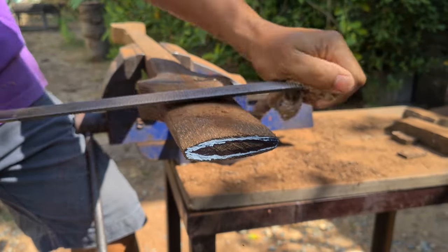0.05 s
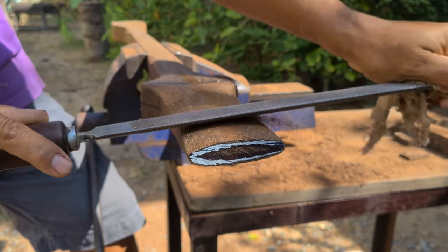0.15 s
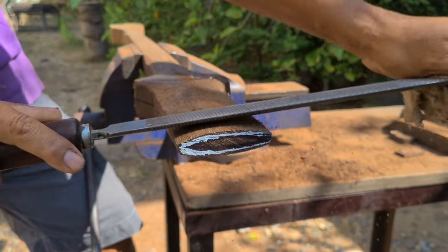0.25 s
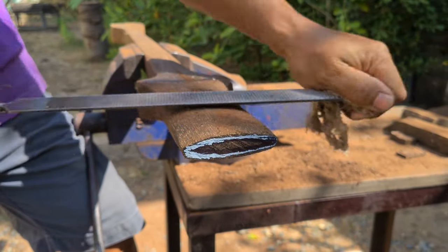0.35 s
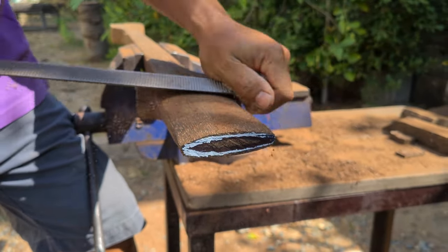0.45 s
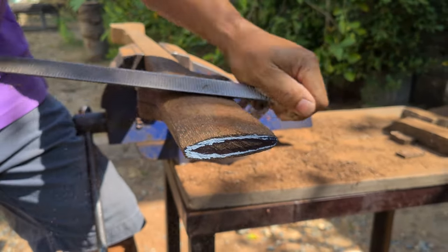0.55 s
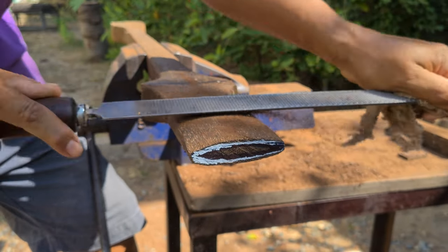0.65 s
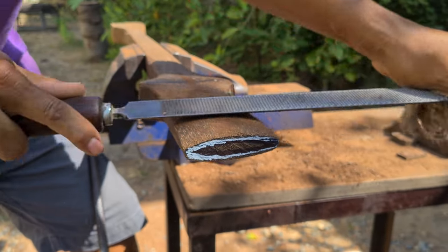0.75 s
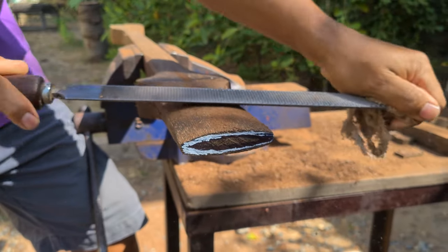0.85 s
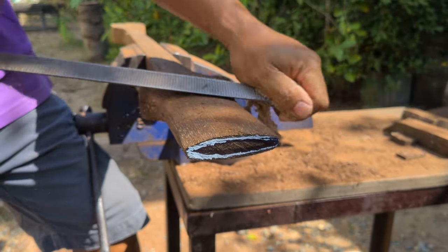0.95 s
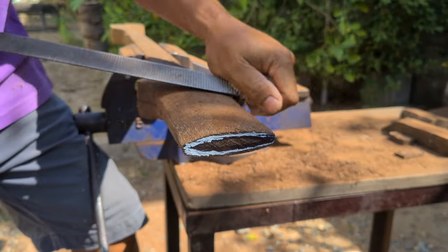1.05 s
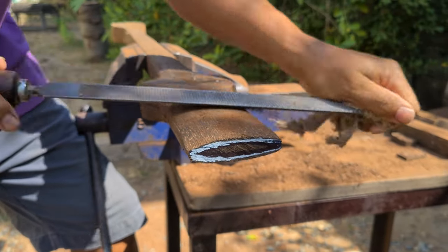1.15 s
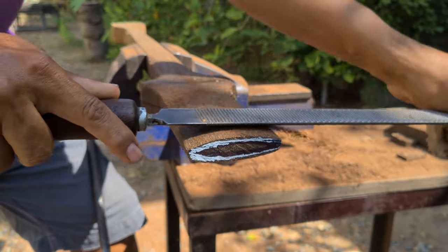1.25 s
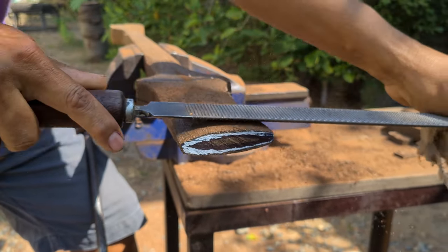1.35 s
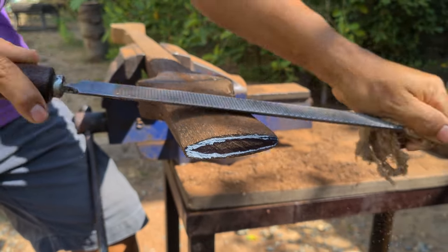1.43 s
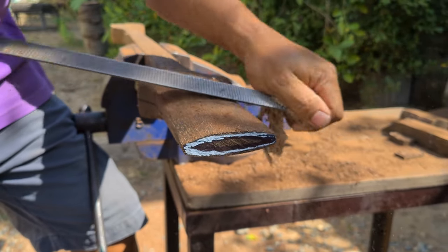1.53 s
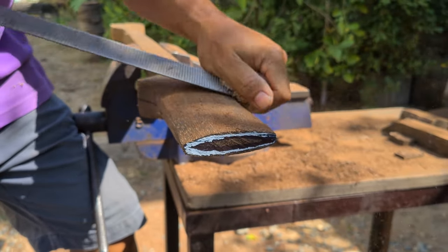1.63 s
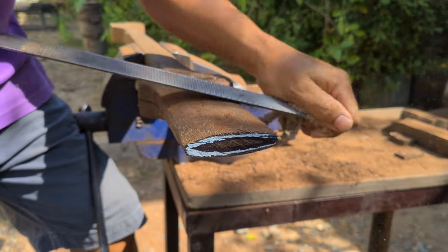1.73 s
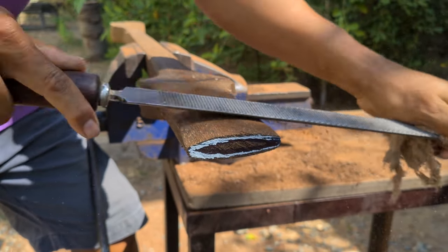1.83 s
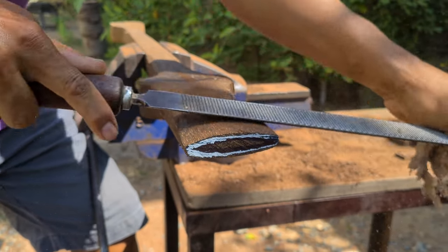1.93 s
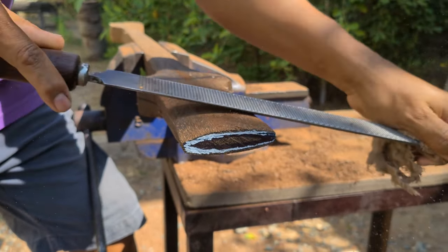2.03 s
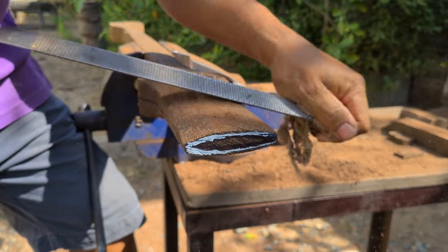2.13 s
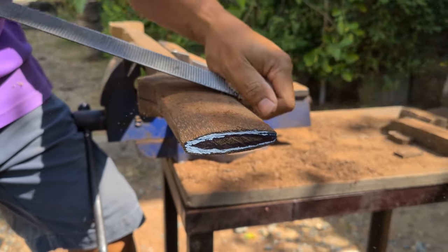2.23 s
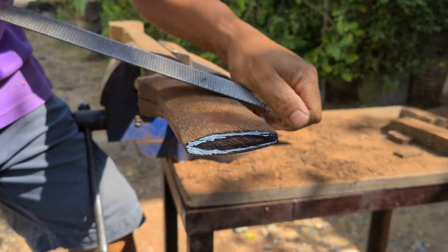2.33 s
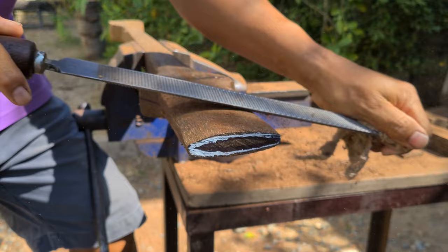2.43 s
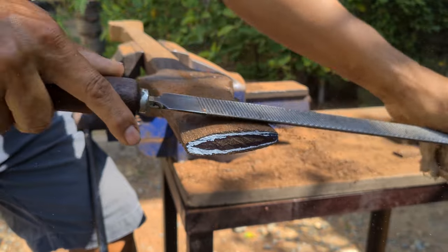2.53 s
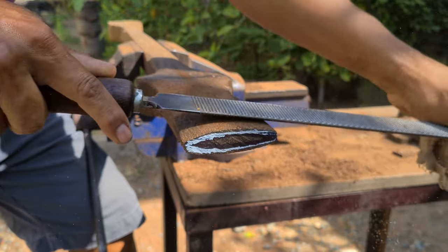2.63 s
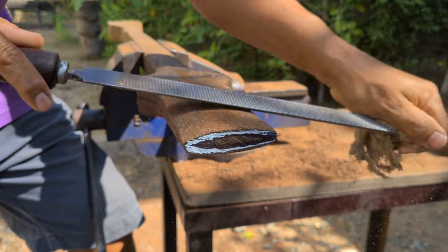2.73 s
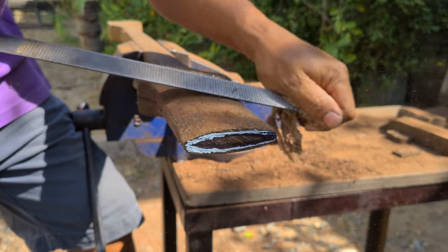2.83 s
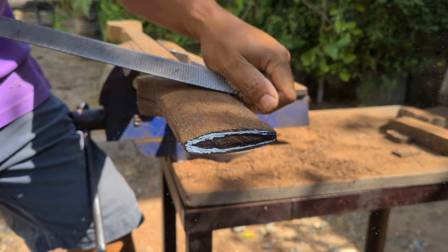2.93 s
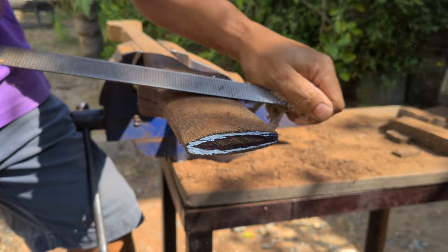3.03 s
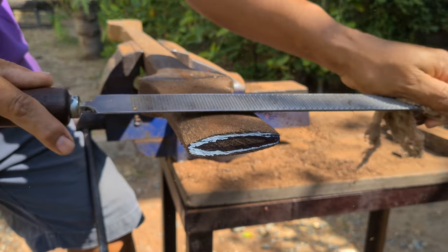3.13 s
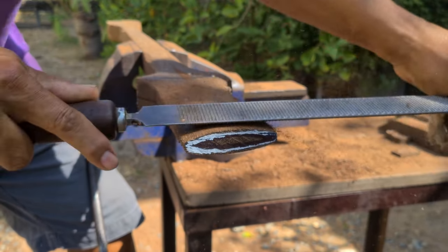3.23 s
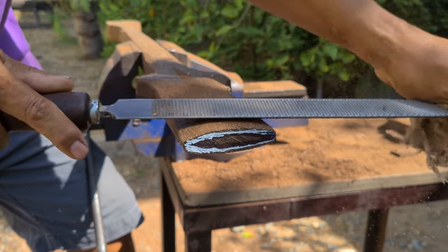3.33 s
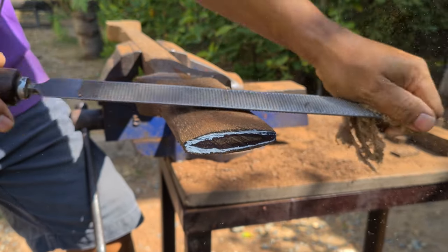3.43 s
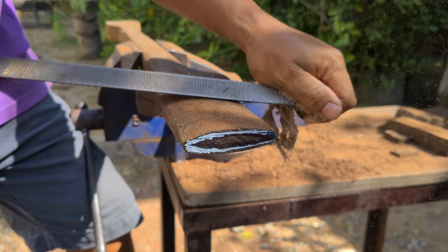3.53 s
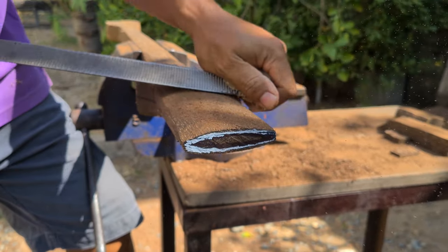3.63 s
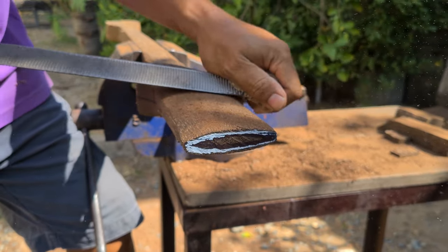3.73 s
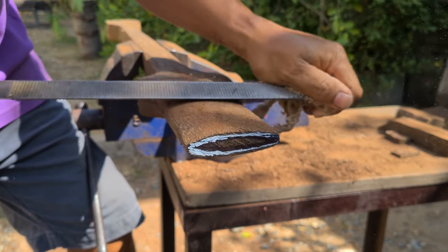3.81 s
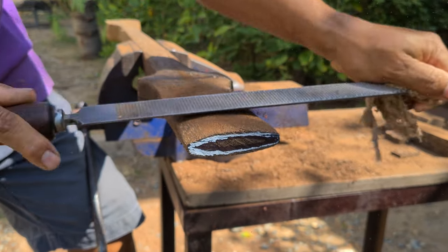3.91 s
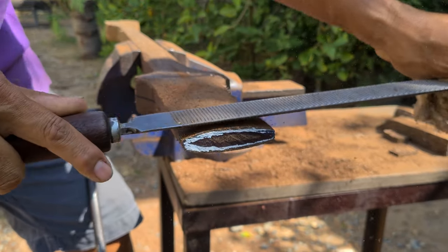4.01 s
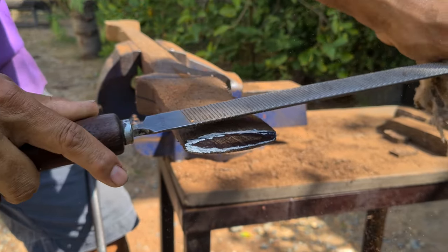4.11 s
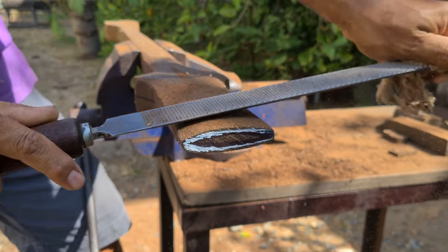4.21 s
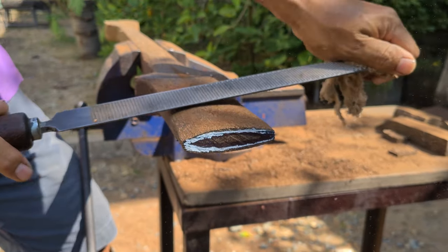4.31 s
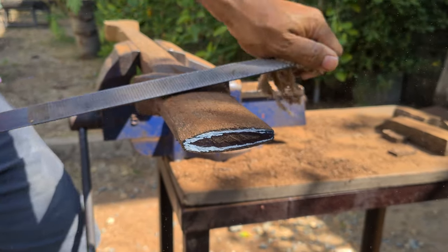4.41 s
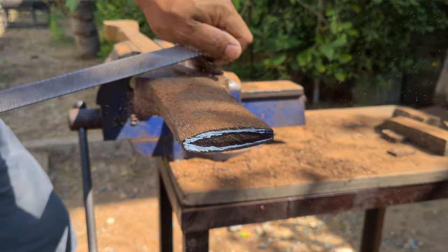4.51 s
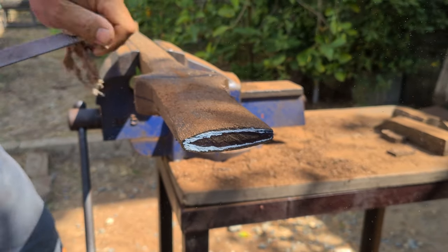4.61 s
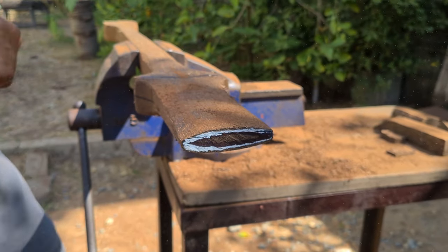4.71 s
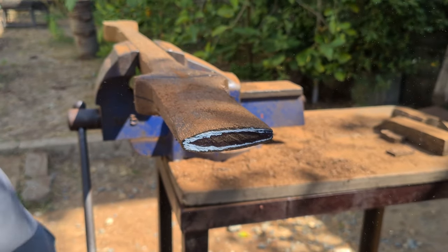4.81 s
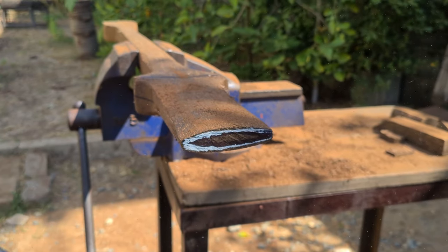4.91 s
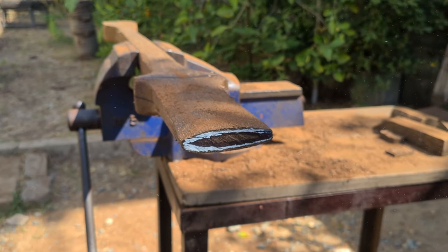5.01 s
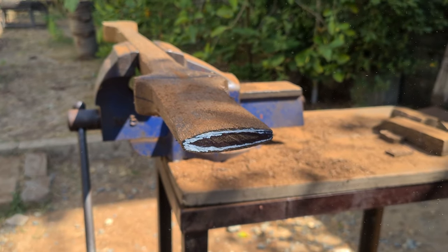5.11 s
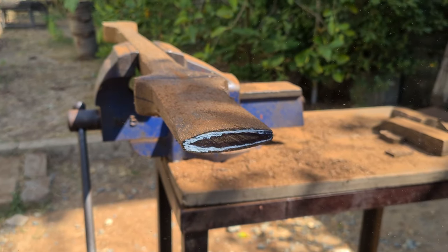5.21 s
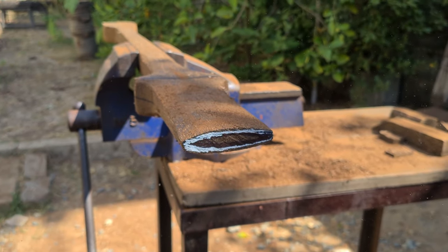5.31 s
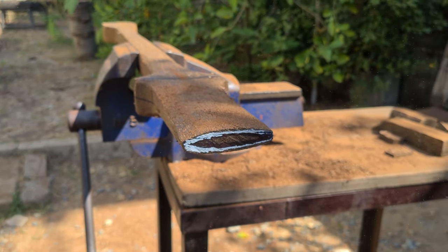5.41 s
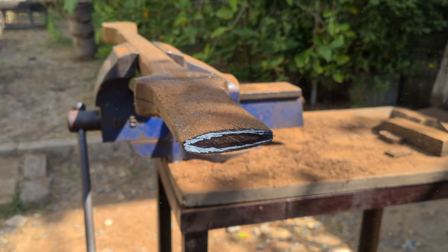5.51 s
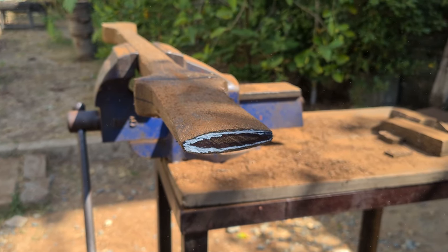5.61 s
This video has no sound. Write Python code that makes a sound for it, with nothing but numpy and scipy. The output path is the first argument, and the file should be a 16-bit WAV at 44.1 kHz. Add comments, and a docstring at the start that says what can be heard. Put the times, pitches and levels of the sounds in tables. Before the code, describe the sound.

Close, dry, stereo filing outdoors. The end of a faint pull is heard at 0 seconds, then a coarse file bites a wooden blank in a vice. Seven loud pushes begin near 0.07, 0.6, 1.15, 1.75, 2.4, 3.05 and 3.8 seconds, each lasting about 0.3 seconds: a fast gritty rasp with woody and metallic ringing, bright at first, sinking into a rough growl as the file slows. Lighter, thinner, scratchy pulls fill the gaps, lengthening later. A dull knock falls at 0.4 and a weaker, brighter one at 2.4. The last push is softer; small knocks and a dry tick around 4.3 lead into a weak final pull ending near 4.6. A short gritty shoe scuff follows at 4.75, then tiny ticks near 5.0 and 5.55. Behind lie quiet open air, low rumble that swells mid-way and fades, and a distant engine hum easing after about 1.2 seconds.

```python
"""First heard is the tail of a light pull; then a coarse steel file bites into a wooden handle blank in a vice.
Outdoors and close by: seven rasping pushes, each followed by a lighter pull, then ticks and the scuff of a shoe.
Tooth kicks and snapping fibres, as pulses and impulses, ring the modes of blank, vice and file.
Coloured noise adds knocks, ticks, scuff, open air and rumble; two wavering sines make a far engine's hum."""
import sys
import numpy as np
from scipy import signal
from scipy.fft import rfft, irfft, next_fast_len
from scipy.io import wavfile

SR = 44100
rng = np.random.default_rng(int(sys.argv[2]) if len(sys.argv) > 2 else 0)


def put_to_file(sound):
    """Save the sound as 16-bit audio at rate SR, in the file named by the first command-line argument."""
    columns = np.atleast_2d(sound).T  # one column per channel
    safe = np.clip(columns, -1, 1)
    whole_steps = np.round(safe * 32767)
    wavfile.write(sys.argv[1], SR, whole_steps.astype(np.int16))


N = 249606
TIME = np.arange(N) / SR   # t/s
SIZE = next_fast_len(N + SR // 2)   # transform length, with room for half a second of tail
HZ = np.maximum(np.arange(SIZE // 2 + 1) * SR / SIZE, 1)   # f/Hz

# Open air and low rumble, colour: [f/Hz, relative level/dB]
AIR_SPECTRUM = [(100, -7), (220, -13.5), (380, -11.5), (620, -19), (1400, -21.5), (2300, -17.5),
                (3200, -27.5), (4800, -27.5), (5400, -36), (7500, -41), (9000, -47.5), (15000, -55.5)]
RUMBLE_SPECTRUM = [(20, -27.5), (48, -10), (95, -12.5), (130, -19.5), (190, -29), (400, -67)]
# Open air over time: [t/s, level/dB]
AIR_LEVEL = [(0, -46), (3.3, -48.5), (4.2, -55), (5.2, -55.5), (5.65, -51.5)]
# Rumble swells, then settles: [t/s, level re RUMBLE_DB/dB]
RUMBLE_SWELL = [(.8, -7.5), (1.8, 3.5), (3.9, 2.5), (4.4, -6)]
RUMBLE_DB = -49
# Two tones of the far engine, about which pitch and level waver: [f/Hz, level at first/dB, level once eased off/dB]
HUM_TONES = [(75.7, -42.5, -59), (99, -52, -51.5)]
EASES_S, EASING_S = 1.14, 0.44   # when the engine starts to ease off, and for how long
# Shoe on the ground, colour: [f/Hz, relative level/dB]
SCUFF_SPECTRUM = [(500, -10.5), (1300, -11.5), (1900, -2), (2600, -8.5), (3600, -2.5), (5000, -16.5),
                  (8000, -30), (15000, -37)]
SCUFF_S, SCUFF_DB, SCUFF_RISE_DB_PER_S, SCUFF_FALL_DB_PER_S = 4.748, -42, 283, 170

# Small dry ticks: [t/s, peak level/dB, centre f/Hz]
TICKS = [(4.345, -20, 1300), (4.663, -43, 1880), (4.986, -39.5, 1440), (5.544, -49, 2000)]
# File knocking on the blank: [t/s, peak level/dB, contact brightness f/Hz]
KNOCKS = [(.410, -11, 680), (2.425, -19, 6000), (4.289, -21, 1400), (4.346, -22, 1800), (4.478, -20, 900)]

# Modes of blank, vice and file:
# [f/Hz, width before damping/Hz, relative level pushing/dB, relative level pulling/dB]
WORK_MODES = [(238, 30, -11, -3), (399, 20, -5, -19), (455, 50, -18, -19), (625, 40, -18, -11),
              (696, 30, -1.5, -1), (870, 70, -12, -19), (1045, 60, -13, -19), (1135, 60, -12, -22),
              (1435, 70, -14, -18), (1685, 55, -2, -8), (1805, 65, -3, -11), (1995, 60, -12, -22),
              (2175, 80, -15, -18), (2478, 55, -6.5, -17), (2615, 60, -11, -25), (2880, 65, -1, -10),
              (3060, 120, -11, -16), (4020, 170, -9, -17), (4900, 250, -16, -26), (5970, 200, -16, -29),
              (7230, 250, -21, -26), (8890, 100, -20, -23), (10810, 100, -20, -24), (12660, 110, -19, -23),
              (14500, 200, -30, -43)]
# Each of those modes at the ears: [left over right/dB, phase by which left leads/rad]
MODES_AT_EARS = [(-1, -0.1), (0, -0.9), (-1, 0.2), (-5, 0.1), (-10, 0.4), (-1, 3.0), (6, 1.4), (3, 1.1),
                 (0, -0.4), (-2, 1.8), (-2, -2.7), (-4, -1.5), (-3, 1.2), (-3, -0.4), (1, 0.3), (3, 0.4),
                 (4, -2.7), (2, 0.3), (-1, 0.5), (6, -2.6), (-1, 0.1), (-9, -2.7), (-6, -2.7), (2, -2.1),
                 (3, -0.5)]
EAR_LAG_S = 0.000466   # the left ear is nearer
# Where the file bears decides how well it feeds the rocking, bending and vice modes:
# [t/s, rocking feed/dB, bending feed/dB, vice feed/dB]
SEAT = [(0.198, -5, -1.5, 2), (.8, 1.5, -2, -2.5), (1.3, -12, -19.5, -9.5), (2.2, 5, -19, 0.5),
        (3.2, -4, -34.5, -4.5), (3.98, 10.5, -14, 4.5), (4.35, -3.5, 2, 3)]
# Rows of WORK_MODES fed by the seat: [index, one per feed column]
SEAT_MODES = (0, 1, 4)

# Pulls: [start t/s, end t/s, relative bite level/dB, attack t/s, release t/s,
#   judder offset/dB, vice ring offset/dB, hiss offset/dB, first touch below the bite/dB]
PULLS = [(-0.22, 0.056, -23, 0.068, 0.061, -2.5, -5.5, -6, 25),
         (0.355, 0.595, -21.5, 0.11, 0.12, -5, -5, 1, 11),
         (0.896, 1.12, -24.5, 0.084, 0.051, -4.5, -4.5, 5.5, 6.5),
         (1.421, 1.74, -23.5, 0.19, 0.068, -2, 0.5, 5, 17.5),
         (2.035, 2.37, -24, 0.19, 0.085, -4.5, -3.5, 5, 32.5),
         (2.70, 3.051, -25, 0.15, 0.072, -1.5, -1, 7.5, 26.5),
         (3.357, 3.795, -26.5, .18, 0.11, -4, -3, 6.5, 22.5),
         (4.288, 4.594, -30, 0.24, 0.067, 0, 0.5, 1, 10.5)]
# A pull thins and brightens towards the file's tip, then judders at the very end:
# [share of stroke, judder re rasp/dB, ring re rasp/dB, hiss re rasp/dB], each before the stroke's offset
PULL_COURSE = [(0, 3.5, 10, -26.5), (.25, 7, 10.5, -28.5), (.5, 0, 5.5, -24), (.8, -4.5, -2.5, -18),
               (1, 11, -1.5, -28.5)]
# Sound straight from the cut on a pull: [f/Hz, relative level/dB]
PULL_SPECTRUM = [(150, -55), (300, -14), (500, -18), (900, -22), (1300, -18.5), (1700, -12.5),
                 (2400, -17.5), (3300, -17.5), (4500, -23.5), (6300, -48), (8500, -29.5), (11500, -47),
                 (15800, -48)]
# Pushes: [start t/s, end t/s, relative bite level/dB, attack t/s, release t/s,
#   judder offset/dB, vice ring offset/dB, hiss offset/dB, top speed/(tooth rows per s)]
PUSHES = [(0.074, 0.335, -17, 0.077, 0.091, 7, 3, -4, 410),
          (0.605, 0.85, -14, .065, 0.11, 3, 2.5, -2.5, 550),
          (1.136, 1.412, -14.5, 0.082, 0.089, -1, 1.5, -2.5, 501),
          (1.757, 2.024, -14.5, 0.081, 0.11, -0.5, 3, -1, 637),
          (2.385, 2.684, -14, 0.087, 0.062, 1, 1.5, -1.5, 550),
          (3.065, 3.338, -15.5, 0.084, 0.067, -.5, 2, -1.5, 500),
          (3.804, 4.135, -20, 0.13, 0.11, 4.5, 3.5, -2.5, 420)]
# As a push slows, hiss gives way to ring and judder: columns as in PULL_COURSE
PUSH_COURSE = [(0, -27, -10, -12), (.16, -21, -16, -9), (0.421, -16, -5.5, -10), (.68, -10.5, -2.5, -12.5),
               (.84, -6, 0.5, -20.5), (1, 3.5, 5, -27.5)]
# A push soon reaches top speed, then slows: [share of stroke, share of top speed]
PUSH_PACE = [(0, .65), (.18, 1), (.42, .91), (.53, .8), (.68, .52), (.84, .39), (1, .33)]
# Sound straight from the cut on a push: [f/Hz, relative level/dB]
PUSH_SPECTRUM = [(150, -21), (300, -13), (500, -20.5), (900, -8.5), (1300, -18.5), (1700, -4), (2150, -10),
                 (3200, -11.5), (4600, -18), (6300, -23.5), (8000, -28), (11500, -27), (13300, -25.5),
                 (15800, -52)]
# A stroke digs in, eases off steadily as the arms travel, and dies away as the file stops
PUSH_TOUCH_DB, STOP_DB = 21, 32.5
PUSH_SAG_DB_PER_S, PULL_SAG_DB_PER_S = 34, 18.5

CUTOFF_HZ = 15850
EARS = np.array([[1], [-1]])   # left, right


def from_db(db):
    """Amplitude factor from level/dB."""
    return np.exp(np.asarray(db) * (np.log(10) / 20))


def rms(x):
    """Root mean square, kept above zero."""
    return np.sqrt(np.mean(x ** 2) + 1e-24)


def in_time(rows):
    """Each column of a table, joined by straight lines in time."""
    s, *columns = np.transpose(rows)
    return [np.interp(TIME, s, c) for c in columns]


def colour(points):
    """Gain at every frequency, by straight lines in dB over log frequency."""
    hz, db = np.transpose(points)
    return from_db(np.interp(np.log(HZ), np.log(hz), db))


def through(x, response):
    """A signal passed through a frequency response."""
    return irfft(rfft(x, SIZE) * response, SIZE)[..., :N]


def band(x, low_hz, high_hz, order=3):
    """Butterworth band-pass."""
    sos = signal.butter(order, [low_hz, high_hz], "band", fs=SR, output="sos")
    return signal.sosfilt(sos, x)


def resonance(hz, width):
    """Response of one damped mode, 1 on top; a wider mode dies away sooner."""
    return 1 / (1 + 1j * (HZ ** 2 - hz ** 2) / (HZ * width))


def drift(rate):
    """Slow chance with a spread of about 1, from random points 2 * rate times a second."""
    steps = rng.standard_normal(N // 50)
    return 1.2 * np.interp(TIME * 2 * rate, np.arange(len(steps)), steps)


def noise(response, side):
    """Coloured stereo noise, rms 1; side sets how unlike the ears are."""
    mid, apart = rng.standard_normal((2, SIZE))
    x = through(mid + side * apart * EARS, response)
    return x / rms(x)


def engine_hum():
    """A far engine: two sines waver in level and phase, and ease to new levels."""
    eased = np.clip((TIME - EASES_S) / EASING_S, 0, 1)
    hum = 0
    for hz, first_db, later_db in HUM_TONES:
        level_db = first_db + (later_db - first_db) * eased + 1.2 * drift(8.9)
        phase = 2 * np.pi * hz * TIME + 0.67 * drift(5)
        hum = hum + from_db(level_db) * np.sqrt(2) * np.sin(phase)
    return hum


def open_air():
    """Wide coloured noise of the open air over a low, wavering rumble."""
    air = from_db(in_time(AIR_LEVEL)[0]) * noise(colour(AIR_SPECTRUM), side=0.77)
    rumble_db = RUMBLE_DB + in_time(RUMBLE_SWELL)[0] + 3.2 * drift(3.7)
    return air + from_db(rumble_db) * noise(colour(RUMBLE_SPECTRUM), side=0.661)


def shoe_scuff():
    """A shoe scuffs the ground: gritty noise in one swell and fade."""
    rise = SCUFF_RISE_DB_PER_S * (SCUFF_S - TIME)
    fall = SCUFF_FALL_DB_PER_S * (TIME - SCUFF_S)
    level_db = SCUFF_DB - np.maximum(rise, fall) + 2.7 * drift(70)
    return from_db(level_db) * noise(colour(SCUFF_SPECTRUM), side=0.73)


def surroundings(x, wet_db, t60, dull_hz):
    """A faint dull tail from hedge and walls: decaying noise echoes, treble lost above dull_hz."""
    t = TIME[:SR // 2]
    tail = rng.standard_normal((2, len(t))) * from_db(-60 * t / t60) * (t > .012)
    tail = tail / np.sqrt(np.sum(tail ** 2) / 2)
    return from_db(wet_db) * through(x, rfft(tail, SIZE) / (1 + 1j * HZ / dull_hz))


def modes(pushing, ring_db=2.0, damping=0.43):
    """Stereo response of each mode; damping scales its width, and the ears differ in level and phase."""
    half = EARS / 2
    responses = []
    for (hz, width, push_db, pull_db), (pan, lead) in zip(WORK_MODES, MODES_AT_EARS):
        mode_db = push_db if pushing else pull_db
        at_ears = from_db(mode_db + ring_db + pan * half) * np.exp(1j * lead * half)
        responses.append(at_ears * resonance(hz, width * damping))
    return responses


def blow(s, db, response, t60):
    """A brief crunching contact: a decaying noise burst into a response, at a given peak level."""
    age = np.maximum(TIME - s, 0)
    decay = from_db(-np.minimum(60 * age / t60, 200))
    x = through((age > 0) * rng.standard_normal(N) * decay, response)
    return from_db(db) * x / np.abs(x).max()


def ticks():
    """Short dry contacts, each a noise burst through one broad resonance."""
    return sum(blow(s, db, resonance(hz, 1400) ** 3, t60=0.061) for s, db, hz in TICKS)


def knocks():
    """The file knocks on the blank and rings the modes of the work."""
    body = sum(modes(pushing=False))
    return sum(blow(s, db, body * resonance(hz, hz) ** 2, t60=0.014) for s, db, hz in KNOCKS)


def row_count(speed, jitter):
    """Tooth rows passed so far, at an unsteady speed."""
    return np.cumsum(speed * (1 + jitter * drift(90))) / SR


def teeth(speed, jitter, uneven_db, tearing, snaps_per_s, snap_db, chatter_db):
    """Forces at three spots of the cut: a kick shared from each tooth row, and each spot's own snapping fibres."""
    rows = row_count(speed, jitter)
    kicks = np.diff(np.floor(rows), prepend=0) * from_db(uneven_db * rng.standard_normal(N))
    kicks = band(kicks, 80, 1160, order=1)   # wood yields, so a kick is soft
    sizes = from_db(snap_db * np.minimum(rng.exponential(1, (3, N)), 4)) * rng.standard_normal((3, N))
    struck = rng.random((3, N)) < snaps_per_s / SR
    snaps = sizes * struck * np.exp(-.8 * (rows % 1))   # strongest just after a row has passed
    return (kicks / rms(kicks) + tearing * snaps / rms(snaps)) * from_db(chatter_db * drift(45))


def bite(age, left, attack_s, release_s, touch_db, sag_db_per_s):
    """Level of a stroke/dB from time since start and time left: attack, sagging hold, release."""
    digging = np.clip(1 - age / attack_s, 0, 1) ** 2
    stopping = np.clip(1 - left / release_s, 0, 1) ** 2
    sag = sag_db_per_s * np.maximum(age - attack_s, 0)
    return -touch_db * digging - sag - STOP_DB * stopping


def strokes(table, course, touches_db, sag_db_per_s, fade_s=.012):
    """Progress through each stroke, and the gains of judder, ring, rasp and hiss as the contact travels."""
    share, *shapes = np.transpose(course)
    progress, gains = np.zeros(N), np.zeros((4, N))
    for (start, end, bite_db, attack_s, release_s, *own), touch_db in zip(table, touches_db):
        touching = np.clip(.5 + np.minimum(TIME - start, end - TIME) / fade_s, 0, 1)
        on = touching > 0
        age, left = TIME[on] - start, end - TIME[on]
        progress[on] = np.clip(age / (end - start), 0, 1)
        rasp_db = bite_db + bite(age, left, attack_s, release_s, touch_db, sag_db_per_s)
        # own also ends with a speed or a touch, which zip leaves out
        judder, ring, hiss = [np.interp(progress[on], share, shape) + db for shape, db in zip(shapes, own)]
        registers_db = rasp_db + np.array([judder, ring, 0 * ring, hiss])
        gains[:, on] += touching[on] * from_db(registers_db)
    return progress, gains


def drive(forces, body, gains):
    """Weights the forces so that judder, ring, rasp and hiss registers of the body each sound at their gain."""
    power, out = np.mean(np.abs(body) ** 2, axis=0), 0
    edges_hz = [140, 560, 1200, 6300, 17000]
    for low, high, gain in zip(edges_hz, edges_hz[1:], gains):
        part = band(forces, low, high)
        energy = 2 * np.sum(np.abs(rfft(part[0], SIZE)) ** 2 * power)
        out = out + gain * part / np.sqrt(energy / (SIZE * N))
    return out


def scatter(spectrum, t60, direct):
    """Sound from the cut arrives directly and scattered off bench and hands, differently at each ear."""
    t = TIME[:SR // 10]
    echoes = rng.standard_normal((2, len(t))) * from_db(-60 * t / t60)
    echoes = rfft(echoes, SIZE) / np.sqrt(np.sum(echoes ** 2) / 2)
    echoes = echoes * HZ / np.hypot(HZ, 900)   # long waves hardly scatter
    straight = direct * np.exp(-2j * np.pi * HZ * EAR_LAG_S * np.array([[0], [1]]))
    return colour(spectrum) * (straight + echoes) / np.hypot(direct, 1)


def radiate(forces, gains, ringing, spectrum, apart, shifting_db):
    """The modes ring, fed unevenly as the contact moves; the cut itself adds a broad rasp."""
    cut = scatter(spectrum, t60=0.028, direct=3.5)
    # each place along the file has dense resonances of its own, which take turns as the contact moves
    places = [scatter(spectrum, t60=0.11, direct=0.035) * HZ / np.hypot(HZ, 1500) for place in range(4)]
    turns = from_db([9 * drift(10) for place in places])
    turns = 0.47 * turns / np.linalg.norm(turns, axis=0)
    body = np.hypot(np.abs(sum(ringing)), np.abs(cut))
    main, near, far = drive(forces, body, gains)

    feeds = [from_db(shifting_db * drift(12) - 4.0) for mode in ringing]
    for k, db in zip(SEAT_MODES, in_time(SEAT)):
        feeds[k] = from_db(db + 2.0 * drift(12))
    rung = sum(mode * rfft(main * feed, SIZE) for mode, feed in zip(ringing, feeds))
    rung = irfft(rung, SIZE)[:, :N]

    patches = sum(through(far * turn, place) for turn, place in zip(turns, places))
    spread = (near + apart * far * EARS) / np.hypot(apart, 1)   # apart widens the rasp between the ears
    return rung + patches + 0.56 * through(spread, cut)


def growl(speed, jitter, uneven_db):
    """The blank shakes at the rate of the passing tooth rows, a rough tone that falls as the file slows."""
    rows = row_count(speed, jitter)
    return from_db(uneven_db * drift(40)) * np.sin(2 * np.pi * rows)


def pulls(speed=250.0):
    """The backs of the teeth skid irregularly over the wood; speed in tooth rows per s."""
    touches_db = [row[-1] for row in PULLS]
    progress, gains = strokes(PULLS, PULL_COURSE, touches_db, PULL_SAG_DB_PER_S)
    forces = teeth(speed, jitter=.16, uneven_db=3.0, tearing=4.0, snaps_per_s=11000, snap_db=2.0, chatter_db=1.8)
    skid = radiate(forces, gains, modes(pushing=False), PULL_SPECTRUM, apart=0.27, shifting_db=6.5)
    return from_db(-4.0) * skid


def pushes():
    """The teeth bite and tear fibres, and the blank growls at the rate of the tooth rows."""
    touches_db = [PUSH_TOUCH_DB] * len(PUSHES)
    progress, gains = strokes(PUSHES, PUSH_COURSE, touches_db, PUSH_SAG_DB_PER_S)
    top_speed, = in_time([(s, row[-1]) for row in PUSHES for s in row[:2]])
    speed = top_speed * np.interp(progress, *np.transpose(PUSH_PACE))
    forces = teeth(speed, jitter=.06, uneven_db=2.5, tearing=8.0, snaps_per_s=13000, snap_db=1.0, chatter_db=1.5)
    rasp = radiate(forces, gains, modes(pushing=True), PUSH_SPECTRUM, apart=0.9, shifting_db=4.5)
    shake = gains[0] * growl(speed, jitter=0.0496, uneven_db=1.5)   # follows the judder gain
    return from_db(-5.5) * shake + from_db(-0.94) * rasp


def scene():
    """Far engine, open air and shoe behind; filing, knocks and ticks in front, with their faint tail."""
    background = engine_hum() + open_air() + shoe_scuff()
    work = ticks() + knocks() + pulls() + pushes()
    return background + surroundings(work, wet_db=-28.0, t60=0.67, dull_hz=4090) + work


def record(dry):
    """The top is cut steeply by an elliptic low-pass."""
    return signal.sosfilt(signal.ellip(12, .1, 90, CUTOFF_HZ, fs=SR, output="sos"), dry)


dry = scene()
out = record(dry)
put_to_file(out)
```